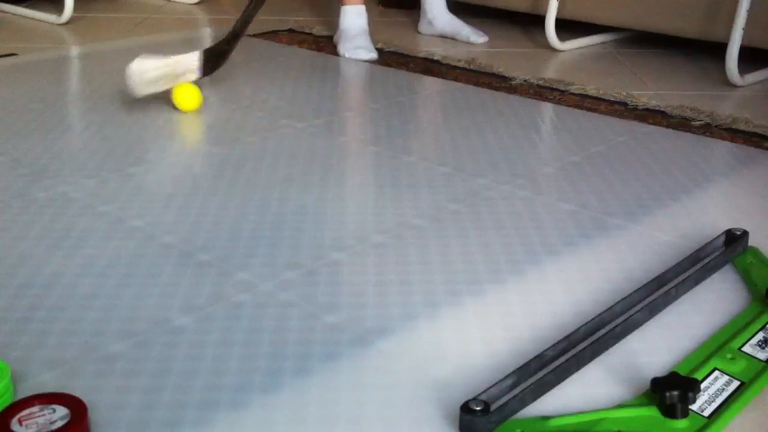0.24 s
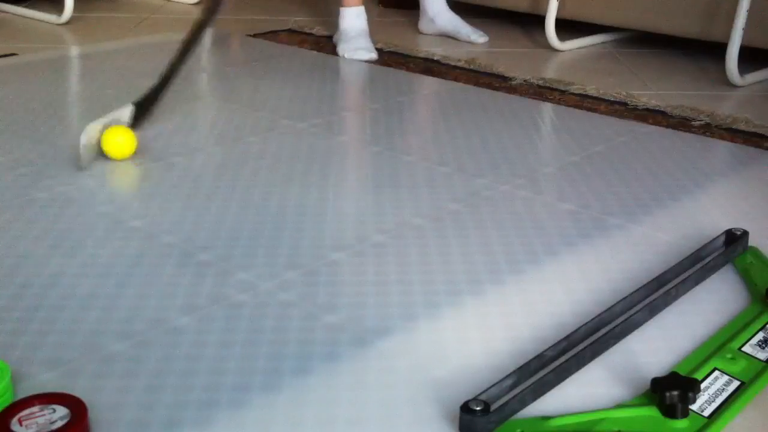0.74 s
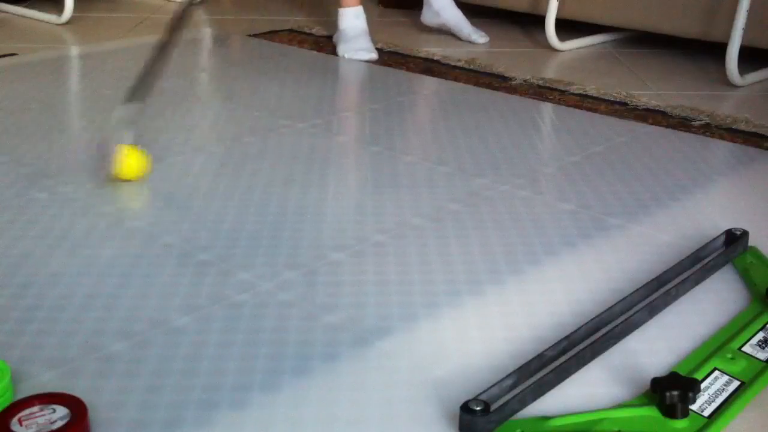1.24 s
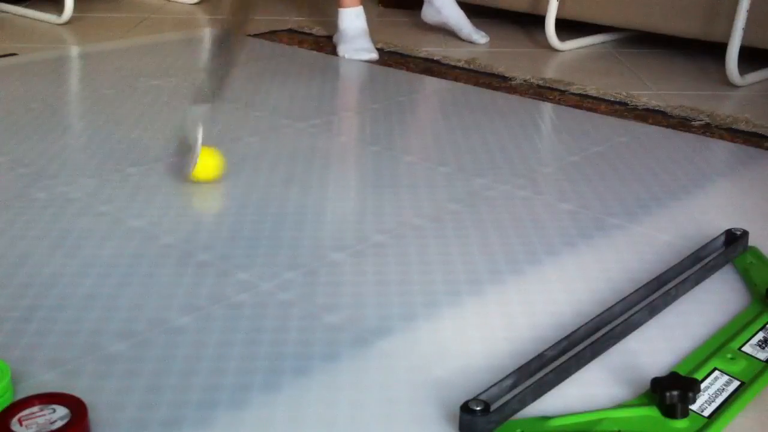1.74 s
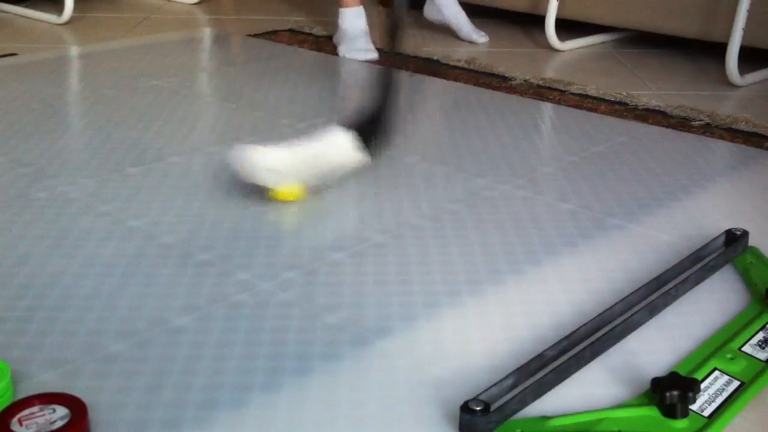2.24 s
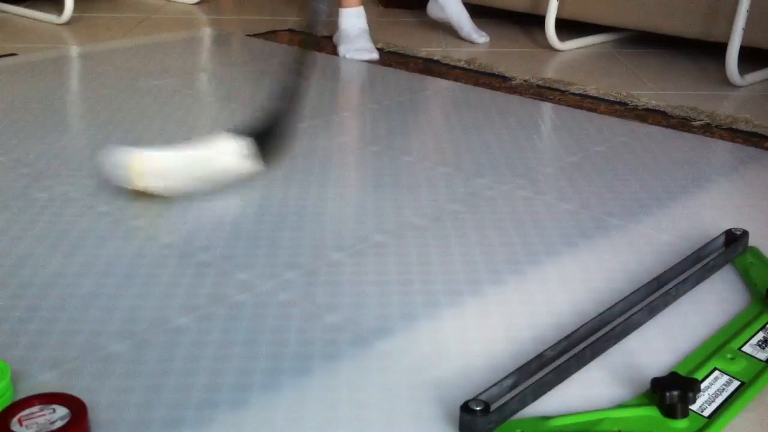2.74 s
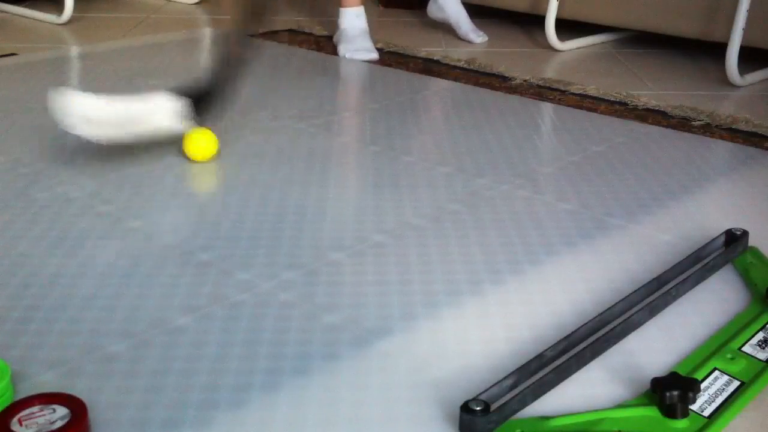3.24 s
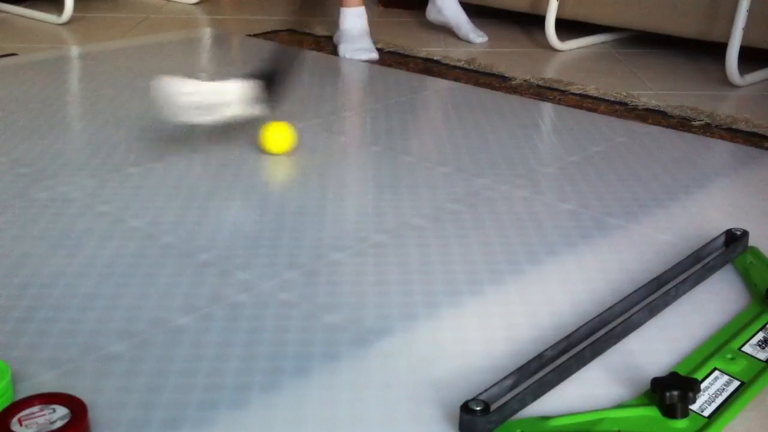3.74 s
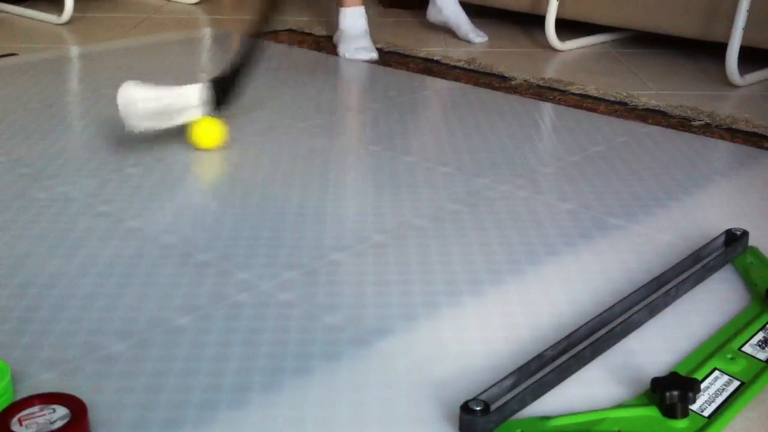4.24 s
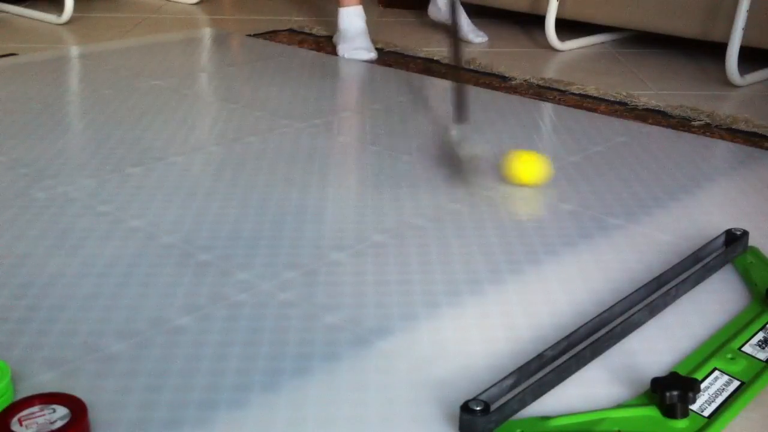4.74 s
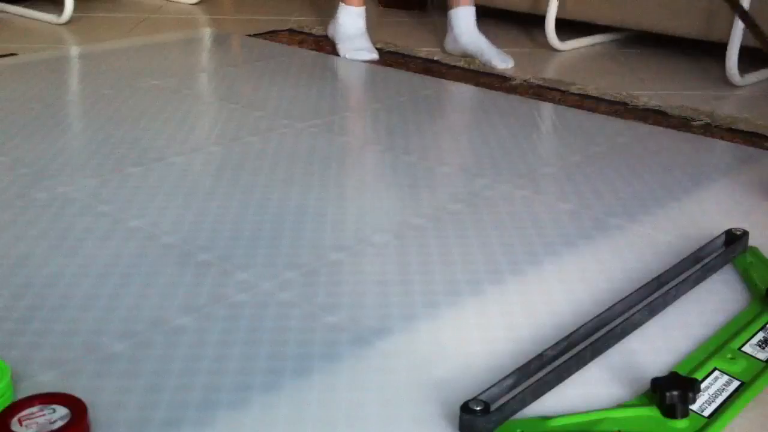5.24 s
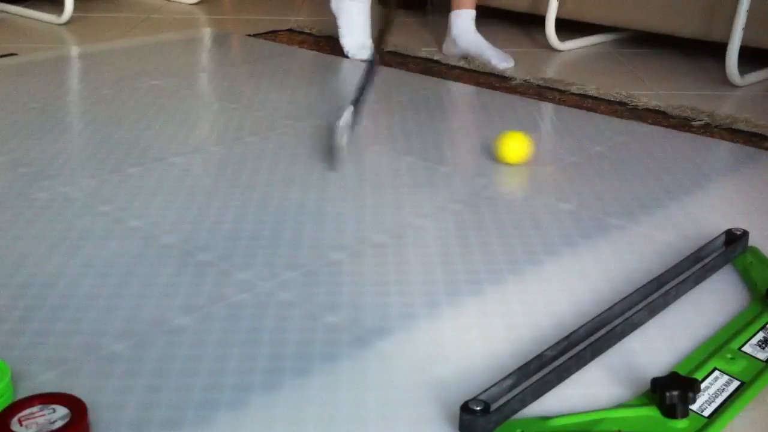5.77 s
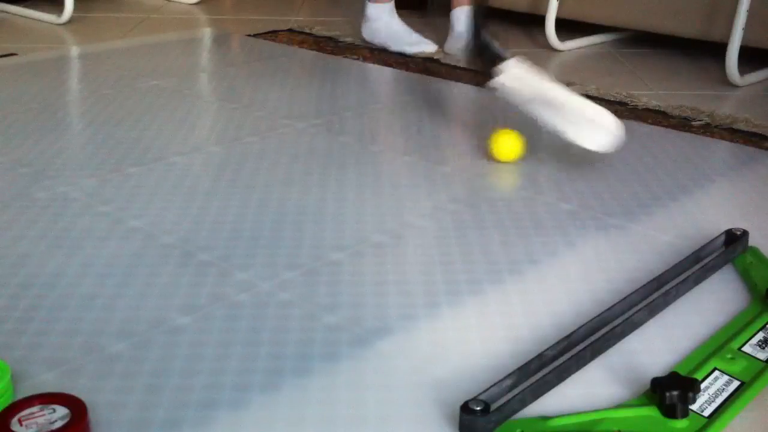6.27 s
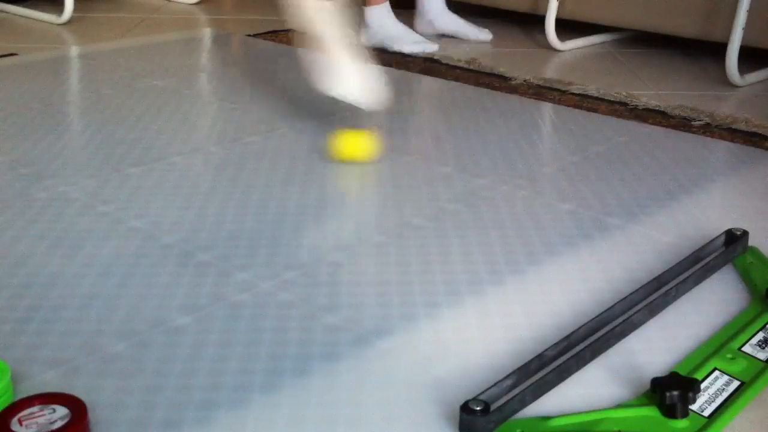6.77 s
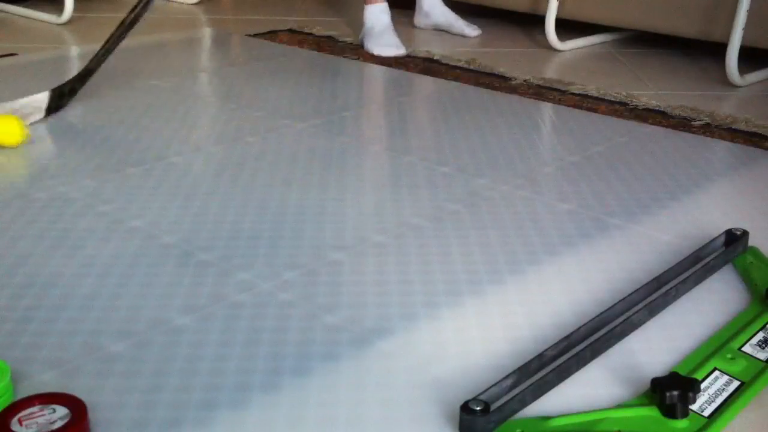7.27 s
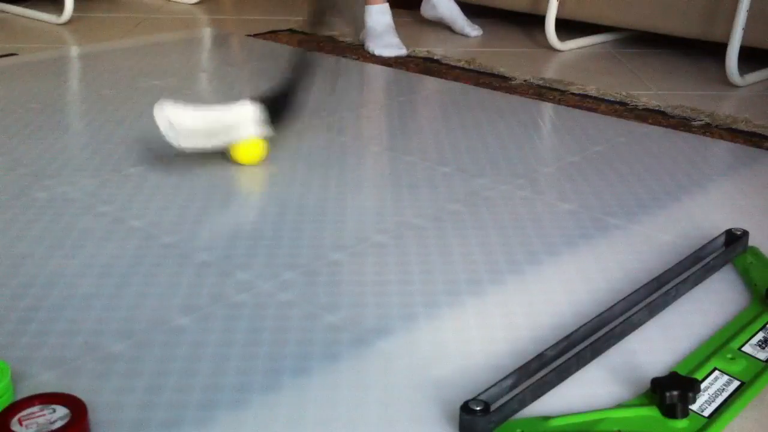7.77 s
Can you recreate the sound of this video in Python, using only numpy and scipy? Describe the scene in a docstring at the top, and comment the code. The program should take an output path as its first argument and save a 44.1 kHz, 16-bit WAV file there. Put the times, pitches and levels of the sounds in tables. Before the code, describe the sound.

In a bare, reverberant room, a hockey stick blade dribbles a hard ball on hollow plastic tiles. Quick sharp cracks come at 0.1 to 0.2 s, then firm knocks at about 0.6, 0.85, 1.05 and 1.3 s, each with a boxy thud and faint hollow shaft ring. A gap follows with only soft rolling and tiny hops until a pair near 2.25 s. Steady taps run from 2.6 to 4.3 s, roughly four a second, with ball hops among them. Around 4.6 s the ball bumps over joints and the taped blade hisses softly; taps at 4.8 and 5.2 s, the latter ringing more. Strong crack at 5.9, another at 6.1, a hop at 6.2, then a longer fading hiss around 6.65 to 7.0 with bumps. Last knocks fall at 7.1, 7.3 and 7.7 s; roll and echo die away by 8. A faint low hush underlies everything; the sound has little bass.

```python
"""A hockey stick blade dribbles a hard ball on hollow plastic floor tiles in a bare, echoing room.
From the start the ball rumbles, a patter of small bumps, and taps thud in the tiles (damped modes),
crack on the blade (a sharp pulse) and ring the hollow shaft; soon the ball also hops over tile joints.
Past the middle, and again later, the taped blade slides with a hiss of uneven noise.
The last taps and the roll die away at the end; a faint room hush lies under it all."""
import sys
import numpy as np
from scipy import signal
from scipy.fft import rfft, irfft, next_fast_len
from scipy.io import wavfile
from scipy.ndimage import map_coordinates

SR = 44100
rng = np.random.default_rng(int(sys.argv[2]) if len(sys.argv) > 2 else 0)


def store_wav(level_fs):
    """Save 16-bit WAV to argv[1]."""
    pcm = np.round(np.clip(np.atleast_2d(level_fs), -1, 1) * 32767)
    wavfile.write(sys.argv[1], SR, pcm.T.astype(np.int16))


N = 353241  # length [samples]


def amp(db):
    """Decibels to gain."""
    return 10 ** (np.asarray(db) / 20)


def unit(x):
    """Scales x to an rms of 1."""
    return x / np.sqrt(np.mean(x ** 2) + 1e-20)


def along(points, hz):
    """Reads a curve of (frequency [Hz], value) points on a log frequency axis."""
    point_hz, value = np.transpose(points)
    return np.interp(np.log(hz + 1), np.log(point_hz + 1), value)


def level(rows):
    """Gain per sample from (time [s], level [dB]) rows, silent outside them."""
    s, db = np.transpose(rows)
    return amp(np.interp(np.arange(N) / SR, s, db, -200, -200))


def filtered(x, response):
    """Shapes x by a response given as a function of frequency."""
    size = next_fast_len(len(x) + 8192)
    spectrum = rfft(x, size) * response(np.fft.rfftfreq(size, 1 / SR))
    return irfft(spectrum, size)[:len(x)]


def noise(spectrum, size):
    """Coloured noise of rms 1."""
    return unit(filtered(rng.standard_normal(size), lambda hz: amp(along(spectrum, hz))))


def pulse(parts, size):
    """One sharp minimum-phase blow, nothing before its start; powers of (spectrum, dB) parts add."""
    hz = np.fft.rfftfreq(2 * size, 1 / SR)
    power = sum(amp(2 * (along(spectrum, hz) + db)) for spectrum, db in parts)
    cepstrum = irfft(np.log(power) / 2)
    # folding the cepstrum forward in time packs the energy at the onset
    cepstrum[1:size] *= 2
    cepstrum[size + 1:] = 0
    return irfft(np.exp(rfft(cepstrum)))[:size]


def ringing(modes, t, spread_db, attack, tilt_db=0, detune=0, damp=1):
    """Damped modes, each struck at a new strength; tilt is per octave about the second mode."""
    hz, db, t60 = np.transpose(modes)[:, :, None]
    db = db + tilt_db * np.log2(hz / hz[1]) + spread_db * rng.standard_normal(db.shape)
    hz = hz * (1 + detune * rng.standard_normal(hz.shape))
    decay = amp(db - 60 * damp * t / t60)
    swell = 1 - np.exp(-t / attack)
    return (decay * np.sin(2 * np.pi * hz * t)).sum(axis=0) * swell


def add(track, x, s):
    """Mixes x into track from second s on."""
    at = round(s * SR)
    x = x[max(-at, 0):][:len(track) - max(at, 0)]
    track[max(at, 0):][:len(x)] += x


# decay of the room's tail: (frequency [Hz], time to drop 60 dB [s])
ROOM_DECAY = [(150, 0.37), (400, 0.45), (1000, 0.76), (2800, 0.8), (7000, 0.64), (12000, 0.51),
              (15300, 0.44), (16200, 0.015)]


def in_room(x, wet_db, build, direct_db=0):
    """Adds first echoes of near walls and furniture, and a diffuse tail that dies by frequency."""
    hz, t, grains = signal.stft(rng.standard_normal(3 * SR // 4), SR, nperseg=256)
    fade = amp(-60 * t / along(ROOM_DECAY, hz)[:, None])
    tail = signal.istft(grains * fade, SR, nperseg=256)[1]
    t = np.arange(len(tail)) / SR
    # the tail swells in over the build time [s], denser in its first milliseconds
    tail = tail * (1 - np.exp(-t / build)) * (1 + 1.7 * np.exp(-t / 0.0031))
    tail = tail / np.linalg.norm(tail)
    delay, size = rng.uniform(0.000964, 0.037, size=8), rng.standard_normal(size=8)
    tail[(delay * SR).astype(int)] += 0.6 * size * np.exp(-delay / 0.011)
    wet = signal.fftconvolve(x, tail)
    # wet_db is the energy of the room sound over that of x
    wet = amp(wet_db) * wet * np.linalg.norm(x) / np.linalg.norm(wet)
    add(wet, amp(direct_db) * x, 0)
    return wet


# colour of the room's hush: (frequency [Hz], relative level [dB])
HUSH_COLOUR = [(40, -21), (70, -13), (100, 1.5), (160, -3), (376, -10.5), (628, -47), (1050, -31),
               (1380, -34), (4390, -40.5), (14800, -43.5), (16500, -51)]


def hush():
    """The faint hush of the room is steady coloured noise."""
    return amp(-51.5) * noise(HUSH_COLOUR, size=N)


# strokes of the sliding blade:
# (time [s], rise over 20 dB [s], hold [s], hiss level [dB], fade during the hold [dB/s])
SLIDE_STROKES = [(4.598, 0.12, 0.135, -49.5, 78), (6.653, 0.042, 0.38, -46.5, 30)]
# colour of the tape's hiss: (frequency [Hz], relative level [dB])
TAPE_COLOUR = [(1000, 6), (2000, 10), (4000, -6), (8000, -8.5), (13000, -10), (15300, -14), (16200, -52)]
LIFT_S = 0.045  # time for the hiss to drop by 20 dB after the hold


def slides():
    """Cloth tape rubs over the ribbed tiles with an uneven grip, fading as the blade slows."""
    grip = map_coordinates(rng.standard_normal(N // 800 + 4), [np.arange(N) / 800])
    t = np.arange(N) / SR
    stroke = np.zeros(N)
    for s, rise, hold, db, fade_db in SLIDE_STROKES:
        rise_db = -20 * np.maximum(s - t, 0) / rise
        slowing_db = -fade_db * np.clip(t - s, 0, hold)
        lift_db = -20 * np.maximum(t - s - hold, 0) / LIFT_S
        stroke += amp(db + rise_db + slowing_db + lift_db)
    hiss = stroke * amp(2.5 * grip) * noise(TAPE_COLOUR, size=N)
    return in_room(hiss, wet_db=-17.5, build=0.0096)[:N]


# the ball hops on a tile joint: (time [s], level [dB])
BALL_HOPS = [(0.462, -31), (0.497, -34), (1.71, -34.5), (1.848, -34), (1.985, -37.5), (2.106, -33),
             (2.172, -34), (2.476, -25.5), (2.508, -18.5), (3.673, -17.5), (4.344, -23.5), (4.526, -22.5),
             (4.564, -20), (4.581, -15.5), (5.394, -26.5), (5.539, -28.5), (5.726, -29), (6.036, -29),
             (6.225, -14), (6.744, -25), (6.857, -32), (6.927, -16), (6.957, -17.5)]
# the ball rolls: (time [s], rumble level [dB])
BALL_ROLL = [(0.0, -50.5), (0.31, -39.5), (0.56, -44), (1.3, -43), (1.55, -55), (1.8, -67), (1.87, -59),
             (2.21, -59), (2.39, -40), (2.7, -54), (3.88, -41), (4.62, -77), (4.77, -37), (5.15, -41.5),
             (5.35, -54), (5.64, -42.5), (6.25, -43.5), (6.5, -55), (6.82, -38), (7.05, -44.5), (7.49, -36),
             (7.9, -48.5), (8.01, -65)]
# a tile over its hollow ribs, also played by the taps; hops damp it faster:
# (frequency [Hz], relative level [dB], time to drop 60 dB [s])
TILE_MODES = [(232, -3, 0.04), (312.5, -2, 0.051), (369, 3.5, 0.057), (437.5, 3, 0.027), (558, -5, 0.04),
              (686, -12.5, 0.05), (840, -29, 0.06)]
# colour of a hard contact, also played by the taps: (frequency [Hz], relative level [dB])
CRACK_COLOUR = [(200, -1), (600, 4), (1100, 4), (1800, -1.5), (2700, -8), (3400, -15.5), (6000, -17.5),
                (16000, -88)]
TILE_SPREAD = 0.041  # tiles differ in pitch by this share
TICK_DB = -8  # gain of the contact tick of a hop, beside its thud


def ball():
    """Soft blows on the tiles: single hops over a dense patter of small bumps."""
    hops, t = np.zeros(N), np.arange(SR // 6) / SR
    tick = amp(TICK_DB) * pulse([(CRACK_COLOUR, 0)], size=1024)
    for s, db in BALL_HOPS:  # the ball lands again and damps the tile
        thud = ringing(TILE_MODES, t, spread_db=1.5, attack=0.003, detune=TILE_SPREAD, damp=1.8)
        add(hops, amp(db) * thud, s)
        add(hops, amp(db) * tick, s)
    # a few hundred bumps a second, some stronger than the rest
    chance, size = rng.random(N), rng.standard_normal(N)
    bumps = np.clip((260 / SR - chance) * SR, 0, 1) * size * amp(1.4 * rng.exponential(size=N))
    # they fall on one of three tiles after another
    tile = rng.integers(3, size=N // 2048 + 1).repeat(2048)[:N]
    patter = np.zeros(N)
    for k in range(3):
        tile_ring = ringing(TILE_MODES, t, spread_db=2.5, attack=0.00057, detune=TILE_SPREAD)
        patter += signal.fftconvolve(bumps * (tile == k), tile_ring)[:N]
    rolling = unit(patter) + amp(-21) * noise(CRACK_COLOUR, size=N)
    close = hops + level(BALL_ROLL) * rolling
    heard = np.zeros(N)
    for s in np.arange(0, N / SR, .5):  # the ball moves on and the room answers anew
        stretch = close[round(s * SR):][:SR // 2]
        add(heard, in_room(stretch, wet_db=3.5, build=0.018), s)
    return heard


# blade taps: (time [s], crack level [dB], then over the crack: tile thud [dB], treble [dB],
# shaft ring [dB], ring tilt [dB/octave], first click [dB])
BLADE_TAPS = [(-0.021, -28, -13, -12, -28, 0, -12), (0.1276, -15, -3.5, -14, -37, -15, 2),
              (0.179, -15.5, -10.5, -2.5, -21.5, 8, 0), (0.5849, -12.5, -5.5, -15.5, -29, 4.5, -5),
              (0.8464, -11.5, -2, -8.5, -39, 2.5, -2.5), (1.0596, -11.5, -3, -6.5, -25, -7, -8),
              (1.2976, -16, -9.5, -9.5, -26, 10.5, -3.5), (1.3404, -28.5, -7.5, -39, -35, 19, -3),
              (2.226, -14, -5, -10, -40, -3, -1), (2.3086, -16, -11.5, -7, -45, 12, -7.5),
              (2.5813, -9.5, -6, -9.5, -47, 9.5, 2.5), (2.821, -12.5, -3, -7, -25, 5.5, 0),
              (3.0671, -14, -5.5, -14.5, -27, 6.5, 2.5), (3.2755, -15, 1, -7.5, -43, 8.5, 3),
              (3.3454, -26, -46, -3, -36, 5, -16), (3.49, -14.5, -8, -10, -26.5, 5.5, -5),
              (3.7067, -17, -1.5, -11.5, -23, 5.5, 0.5), (3.9411, -27, 5, 2, -38, -3, -1.5),
              (3.9956, -18, -22, -11.5, -42, 3, -5), (4.1765, -16.5, -5, -10, -30, -6, -4),
              (4.2531, -16, -11.5, -4.5, -24.5, 7, -6), (4.4371, -29.5, -12, -21, -34, -3, -11),
              (4.778, -20.5, -2.5, -15.5, -28, 5, -1), (5.1456, -38, -7, -23, -30, 4, -11),
              (5.2244, -15, -17, -2, -11, 1, -17), (5.8811, -10.5, -6, -10, -27, 6.5, -4.5),
              (6.0995, -15, -18.5, -8, -28.5, 4.5, -5.5), (6.6281, -19, -26, -15, -26, 7, -20.5),
              (7.1008, -14, 2, -12, -26, 2, 2.5), (7.2856, -14, -6.5, -3.5, -22, 9.5, -6.5),
              (7.3253, -14, -23, -25, -40, -18, 0), (7.6747, -12.5, -1.5, -7, -35, 4.5, -4.5)]
# air column and walls of the shaft: (frequency [Hz], relative level [dB], time to drop 60 dB [s])
SHAFT_MODES = [(770, -12, .14), (990, 0, .22), (1227, -8, .16), (1500, -9, .14), (1760, -8, .16),
               (1980, -13, .1), (2290, -12, .1), (2560, -14, .1), (2960, -17, .08), (3350, -20, .07)]
# short woody notes of the blade: (frequency [Hz], relative level [dB], time to drop 60 dB [s])
BLADE_MODES = [(1250, -5, .012), (1800, 0, .016), (2650, -8, .007)]
# treble of the crack: (frequency [Hz], relative level [dB])
SNAP_COLOUR = [(1500, 3), (3500, -2.5), (5000, -3.5), (7000, -5.5), (10000, -9), (16000, -39)]
# top of the treble: (frequency [Hz], relative level [dB])
SIZZLE_COLOUR = [(5000, -20), (9000, -3), (12500, 0), (14500, -4), (15600, -12), (17000, -24)]
# the sizzle over the rest of the treble [dB]; it rises with the first click, from GLANCE_DB up
SIZZLE_DB, SIZZLE_PER_DB, GLANCE_DB = -14.5, 1.3632, -6
BLADE_DB = -15.5  # notes of the blade under the crack, before tilt


def taps():
    """Every tap lands at a new spot, so the room answers each one anew."""
    out, t = np.zeros(N), np.arange(SR // 4) / SR
    for s, db, thud_db, treble_db, ring_db, tilt_db, click_db in BLADE_TAPS:
        thud = ringing(TILE_MODES, t, spread_db=2.5, attack=0.0002, detune=TILE_SPREAD)
        thud = amp(thud_db) * thud
        # a blow on the stiff heel wakes the higher shaft modes and the notes of the blade
        shaft = amp(ring_db) * ringing(SHAFT_MODES, t, spread_db=1.5, attack=.008, tilt_db=tilt_db)
        blade = ringing(BLADE_MODES, t, spread_db=2.5, attack=.0003, detune=.08)
        stick = shaft + amp(BLADE_DB + tilt_db) * blade
        sizzle_db = treble_db + SIZZLE_DB + SIZZLE_PER_DB * max(click_db - GLANCE_DB, 0)
        crack_parts = [(CRACK_COLOUR, 0), (SNAP_COLOUR, treble_db), (SIZZLE_COLOUR, sizzle_db)]
        add(stick, -amp(19.5) * pulse(crack_parts, size=1024), 0)
        # a glancing contact, or a blade turned away, gives less first click and a slower swell
        swell = 0.00078 * amp(-1.2 * click_db)
        add(out, amp(db) * in_room(stick, wet_db=9.5, build=swell, direct_db=click_db), s)
        add(out, amp(db + 11) * shaft, s)  # the shaft is also heard direct
        add(out, amp(db) * in_room(thud, wet_db=4.5, build=0.0051), s)
    return out


def scene():
    """Layers all sources over the faint hush of the room."""
    return (hush() + slides() + ball() + taps())[None]


LOW_CUT_HZ, TOP_HZ = 201.2, 16990  # band of the microphone


def record(dry):
    """A small microphone cuts the bass; loud peaks saturate a little lopsidedly."""
    low_cut = signal.butter(5, LOW_CUT_HZ, "high", fs=SR, output="sos")
    x = signal.sosfilt(low_cut, dry[0])
    x = x + 0.097 * x ** 2  # lopsided
    x = x / (1 + np.abs(x / .78) ** 4) ** (1 / 4)  # soft ceiling
    return filtered(x, lambda hz: hz < TOP_HZ)[None]


dry = scene()
out = record(dry)
store_wav(out)
```